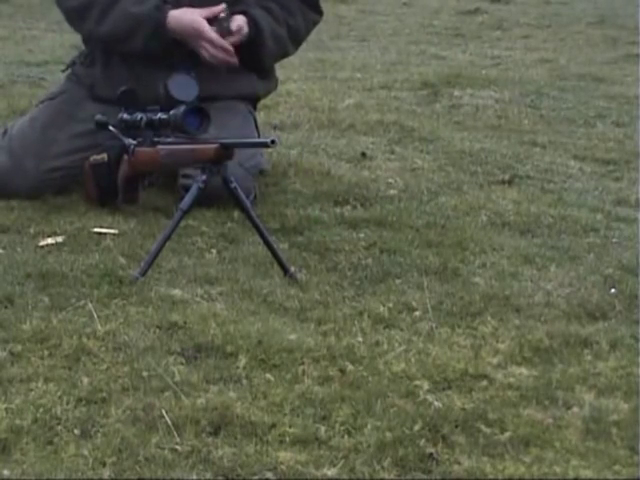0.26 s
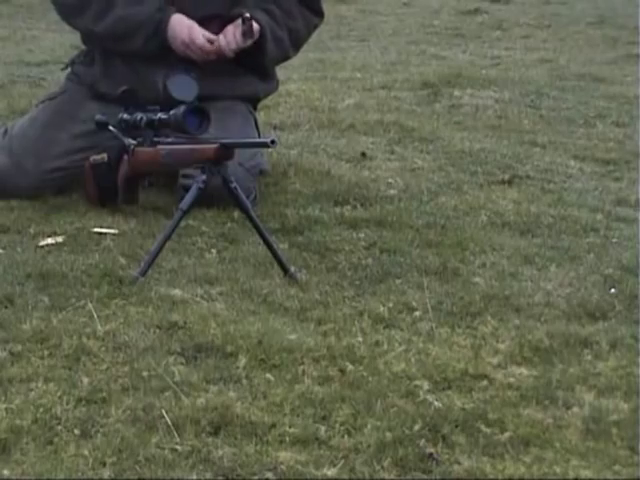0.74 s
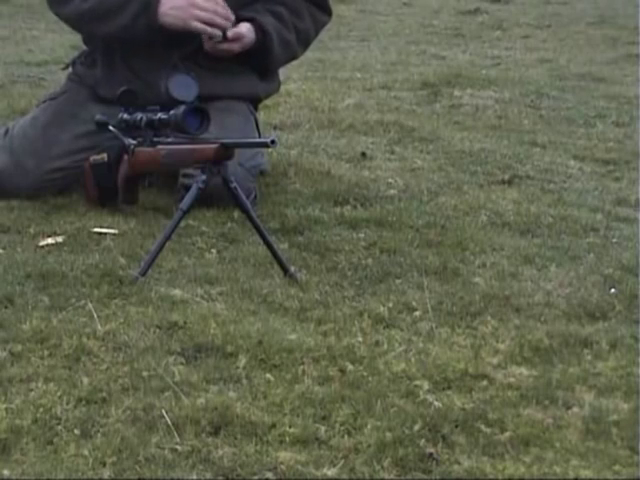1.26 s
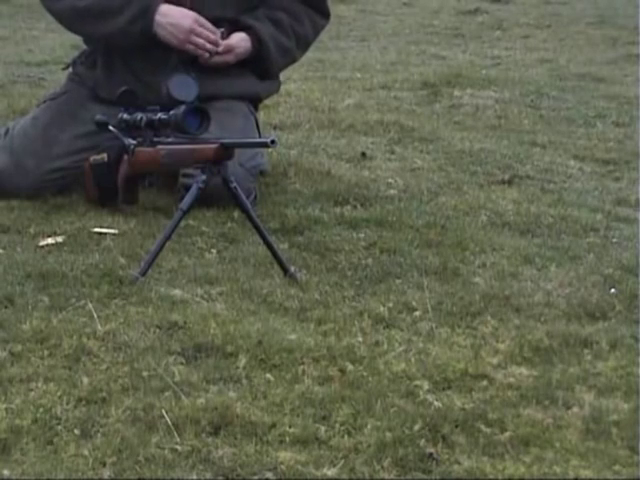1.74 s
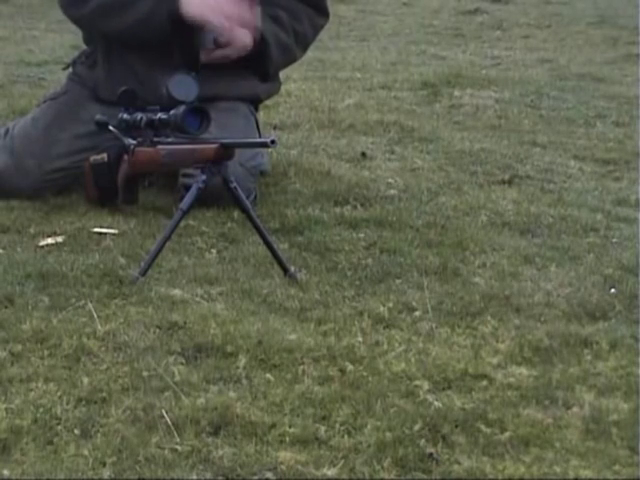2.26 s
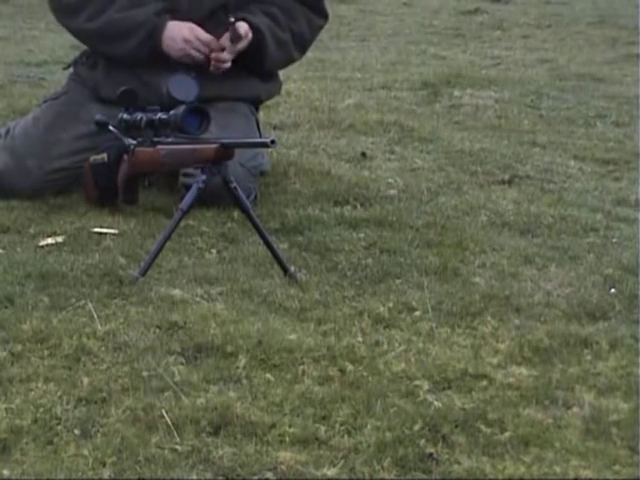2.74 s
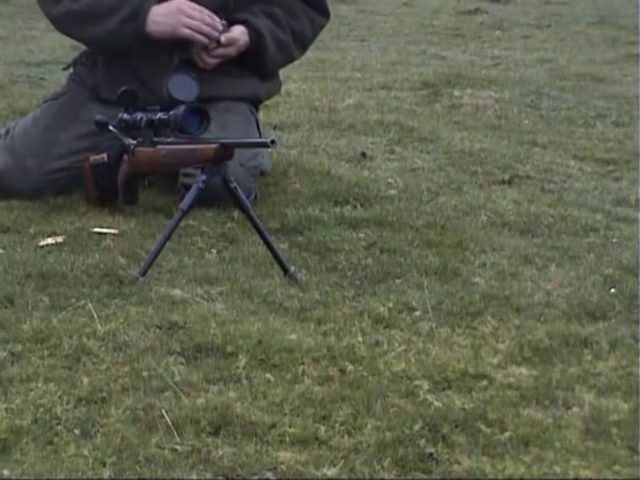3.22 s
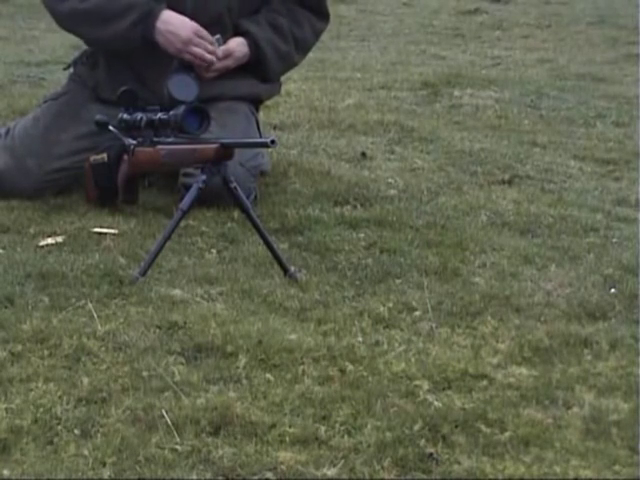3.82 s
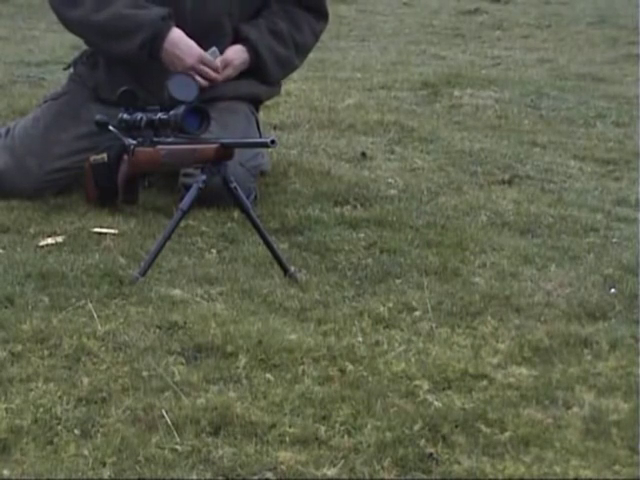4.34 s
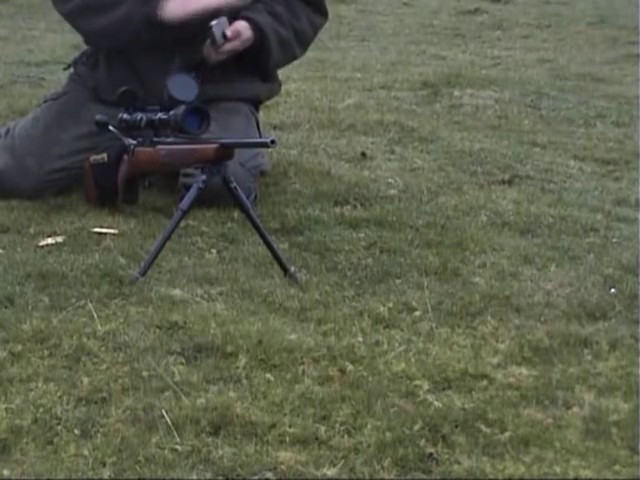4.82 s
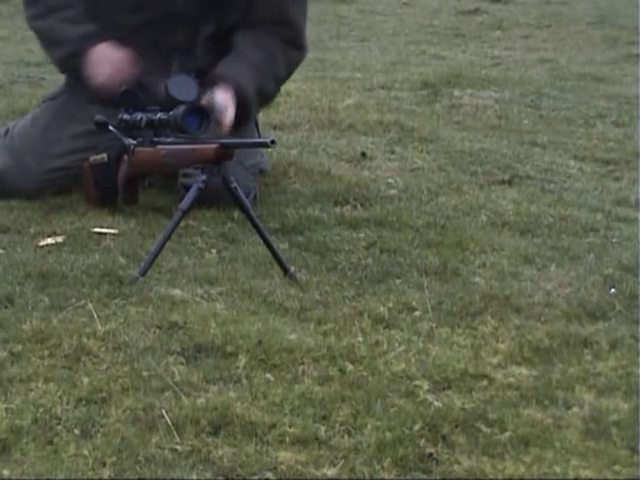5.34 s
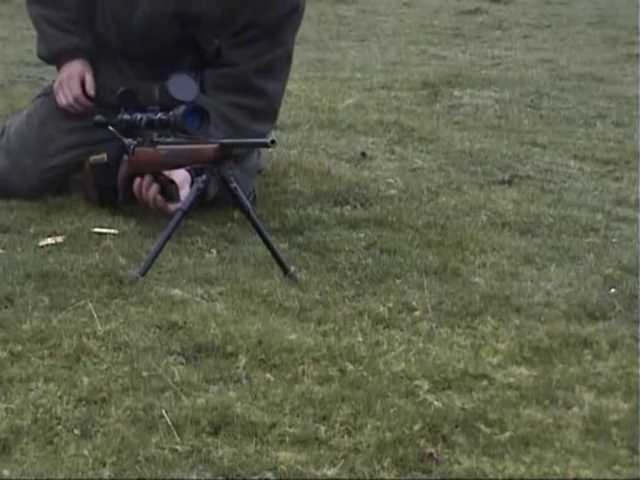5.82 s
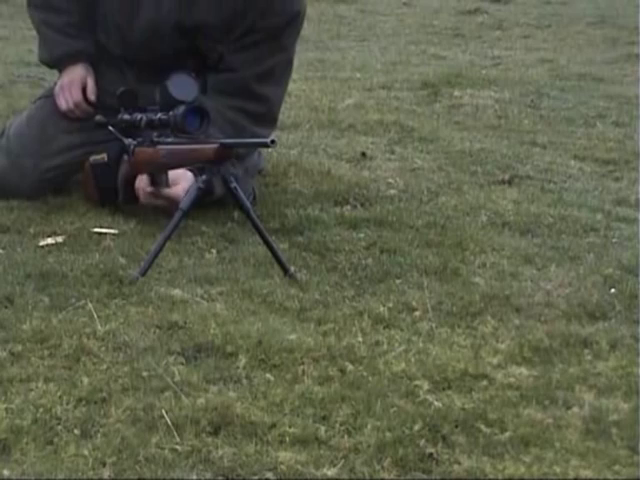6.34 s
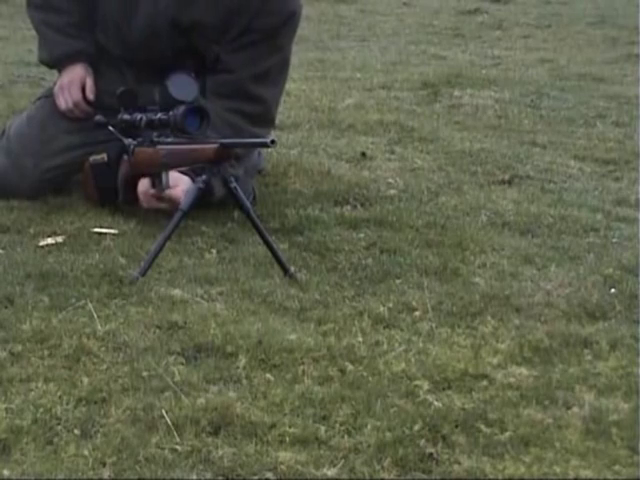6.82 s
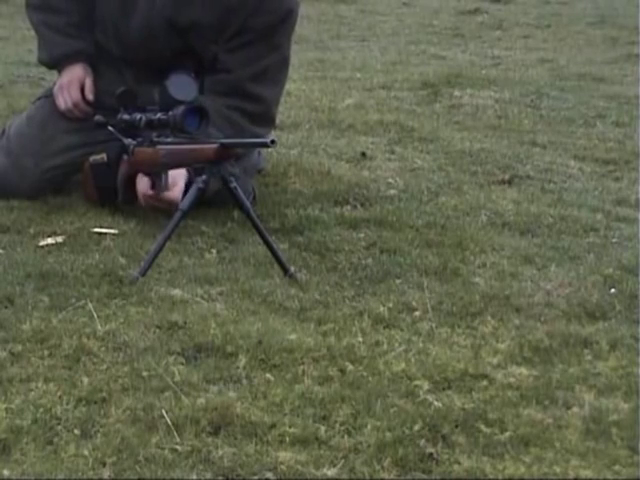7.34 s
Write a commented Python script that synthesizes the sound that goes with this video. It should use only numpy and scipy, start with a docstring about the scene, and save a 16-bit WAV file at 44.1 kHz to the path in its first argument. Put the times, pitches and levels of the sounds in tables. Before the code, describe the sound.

Outdoors, close hands press cartridges into a steel magazine: a crisp click pair at the start, then sparse small ticks and faint scrapes. A hard bright metallic slap lands around five seconds, followed by lighter fumbling ticks, a seating click and a final sharp latch snap. A steady thin high camera-motor whine, soft hiss, far rumble and wavering low engine-like hum continue underneath, recorded by an on-camera stereo microphone.

```python
"""All through, a camera's motors whine in thin steady tones over hiss, a far rumble and a wavering low hum.
Over this, outdoors, cartridges are pressed into a steel magazine, which is slapped and latched into a rifle.
The motors are sums of sine tones and a repeating rattle; hiss and rumble are filtered noise, the hum one sine.
Each click is a short chatter of metal contacts ringing steel modes. Scrapes and soft hand thumps are
short bursts of shaped noise."""
import sys
import numpy as np
from scipy import signal
from scipy.fft import rfft, irfft, next_fast_len
from scipy.io import wavfile
from scipy.ndimage import map_coordinates

SR = 44100
rng = np.random.default_rng(int(sys.argv[2]) if len(sys.argv) > 2 else 0)


def dump(signal):
    """Clip the signal to [-1, 1] and save it as 16-bit WAV at the path in sys.argv[1]."""
    limited = np.clip(np.atleast_2d(signal).T, -1, 1)
    pcm = np.round(limited * 32767).astype(np.int16)
    wavfile.write(sys.argv[1], SR, pcm)


def amplitude_ratio(level_db):
    """Convert a level in decibels to the matching linear amplitude (field) ratio."""
    exponent = np.asarray(level_db, float) / 20
    return 10 ** exponent


N = 334278  # length in samples

# How fast the teeth pass in the two motors. Each entry: rate in Hz.
TEETH_HZ = 95.748, 96.026
# How fast the two motor shafts turn. Each entry: turns per second.
SHAFTS_HZ = 95.748 / 7, 96.026 / 8
# Strong tones of the first motor. Each row: multiple of its tooth rate, left level in dB, right level in dB.
FIRST_MOTOR = [(12, -72, -69), (59, -69, -72), (64, -75, -67), (65, -71, -65), (69, -71, -67),
               (70, -73, -62), (74, -76, -63), (76, -73, -66), (78, -85, -63), (79, -76, -66),
               (80, -64, -70), (81, -73, -68), (82, -80, -67), (86, -80, -63), (92, -76, -69),
               (93, -76, -68), (99, -65, -70), (111, -65, -73), (112, -80, -67), (123, -69, -65)]
# Some tones of the second motor. Each row: multiple of its tooth rate, left level in dB, right level in dB.
SECOND_MOTOR = [(81, -67, -66), (84, -77, -65), (93, -84, -66), (99, -66, -70), (111, -75, -68)]
# Tones that belong to neither motor's series. Each row: pitch in Hz, left level in dB, right level in dB.
STRAY_TONES = [(5193.2, -77, -66), (6236.6, -72, -67), (7360.0, -75, -67), (8204.5, -74, -65),
               (9779.1, -66, -69)]
# Tone colour of the weak shaft rattle. Each row: frequency in Hz, relative level in dB.
RATTLE_COLOUR = [(1000, -13), (3500, -13), (5500, 1), (8500, -26), (11500, -5.5), (12300, -13),
                 (12500, -30), (14400, -8.5), (15300, -67)]
# Tone colour of hiss and far rumble. Each row: frequency in Hz, relative level per Hz in dB.
AIR_COLOUR = [(15, -52), (25, -24), (76, -15), (110, -16.5), (140, -12.5), (175, -19), (249, -7),
              (463, -12), (962, -15), (1160, -13), (1400, -17.5), (2760, -19.5), (5280, -20.5),
              (7920, -17.5), (11000, -19), (12100, -38), (12350, -36), (12450, -46), (13300, -44),
              (14400, -21), (15300, -70)]
# How alike hiss and rumble are left and right. Each row: frequency in Hz, likeness from -1 to 1.
AIR_LIKENESS = [(60, 1), (160, 0.43), (270, 0.88), (450, 0.072), (740, -0.33), (1300, 0.34), (3000, 0.11),
                (5000, 1), (9000, 0.37), (12500, -0.18)]
# Swell of the deep rumble. Each row: time in seconds, boost in dB.
DEEP_SWELL = [(0, 5.5), (1.1, 5.5), (1.5, 8.5), (2.6, 8), (3.6, 8.5), (4.2, 6), (5, 5), (6, 5), (7.58, 6.5)]
# Path of the far hum, before it wavers. Each row: time in seconds, pitch in Hz, level in dB.
HUM_PATH = [(0.0, 76.7, -55.5), (1.35, 81.5, -72), (1.73, 70.5, -65), (1.9, 80.33, -63.5),
            (4.33, 76.7, -57), (4.66, 81.3, -69), (4.79, 70.5, -66), (5.15, 76.0, -69), (7.01, 75.6, -57),
            (7.33, 82.3, -74), (7.58, 70.7, -68)]
# Metal contacts. Each row: start in seconds, middle-band level in dB before the mix, brightness in dB (added
# to the high band, taken from the low), favoured ring in Hz, time for the chatter to fall 60 dB in seconds.
CONTACTS = [(.0556, -47.5, -7.5, 2550, 0.023), (.0967, -25.5, 1, 2685, 0.027),
            (.1033, -37, 1.5, 1080, 0.013), (.1076, -42, 1, 3840, 0.022), (.2365, -47.5, 0, 2520, 0.02),
            (.2925, -53, 4, 2470, .016), (.3462, -46, 11, 2450, 0.019), (.3552, -43, 7, 6130, 0.023),
            (.3592, -26.5, 4, 1300, 0.014), (.3675, -34, 2.5, 8950, 0.0057),
            (1.4129, -30.5, 1, 8570, 0.017), (1.4197, -28.5, 3.5, 2550, 0.015),
            (1.545, -54, -2, 2440, 0.014), (1.7231, -48.5, 3.5, 1500, 0.013),
            (1.7305, -45.5, 0, 7760, 0.0078), (1.7458, -47, 5, 3200, 0.02), (1.8028, -45, 2, 4130, 0.0054),
            (1.9618, -47, 9, 4140, 0.0062), (2.1074, -34.5, 3.5, 3040, 0.0075),
            (2.2125, -49.5, -12.5, 2510, 0.018), (2.2209, -38.5, 5.5, 2440, 0.007),
            (3.3674, -43, 5.5, 2800, 0.0083), (3.456, -49, 2, 810, 0.0041),
            (3.5039, -40.5, 1.5, 2700, .009), (3.5961, -44, 1, 2500, 0.012), (3.6681, -51, 2, 3960, .013),
            (3.755, -46, 13, 4030, 0.0033), (3.7977, -52, -1, 3840, .016), (3.8507, -45, -3.5, 3880, 0.006),
            (4.397, -40, -1, 1960, 0.0099), (4.4242, -50.5, -0.5, 2060, 0.034),
            (4.5584, -29.5, 0.5, 2060, 0.014), (4.5756, -48, -1, 2200, .008),
            (4.6072, -50, 4, 9100, 0.0059), (4.6234, -34, 0.5, 2250, 0.012),
            (4.9803, -27.5, 4.5, 1925, 0.0087), (4.9822, -26.5, 9.5, 3750, .008),
            (4.9898, -22.5, 10, 2440, 0.015), (4.9921, -20, 4.5, 6220, 0.0054),
            (4.9953, -23, 6, 5570, 0.011), (5.0189, -52, 0, 1900, .007), (5.3178, -42, 7, 3380, 0.0092),
            (5.3254, -45, 0.5, 3420, 0.0054), (5.365, -38, -1, 3160, .007), (5.4837, -45, -4, 3380, 0.0056),
            (5.8968, -41, 0.5, 2030, 0.018), (5.8997, -28, 5, 3230, .01), (5.9065, -46, -1, 1800, 0.024),
            (5.95, -38.5, 0, 3200, 0.0062), (5.9544, -41.5, 4.5, 3300, .014), (5.9653, -48, 1, 3220, .013),
            (6.1464, -30.5, -1.5, 2744, 0.0047), (6.1528, -49.5, -3, 1820, .013),
            (6.159, -48, 3, 3260, .012), (6.3617, -46.5, -4, 1530, 0.014), (6.678, -57, 2, 1530, 0.01),
            (6.9912, -59, 7, 7800, .004), (7.0963, -41.5, 1, 9000, 0.0087), (7.1032, -40, 2.5, 8800, 0.011),
            (7.1087, -42.5, 0, 1580, .014), (7.1757, -45.5, 2, 2050, 0.027), (7.4309, -47, 4, 9000, .01),
            (7.4963, -27, 0, 2850, 0.012), (7.4975, -25, 4, 5040, 0.009), (7.4992, -36, -6, 1900, 0.011),
            (7.5045, -42, -3, 1890, .016)]
# Ringing modes of magazine, cartridges and latch. Each row: pitch in Hz, relative level in dB,
# time to fall 60 dB in seconds.
STEEL = [(766, -7.5, 0.025), (1063, -2, 0.026), (1390, -12.5, 0.0043), (1510, -4.5, 0.034),
         (1750, -1, 0.018), (1869, 1.5, 0.0037), (1986, 1.5, 0.0056), (2335, 3, 0.024), (2687, -1.5, 0.01),
         (2800, -3, 0.0056), (3320, -12, 0.011), (3450, -8.5, 0.005), (3660, 8, 0.0034), (3714, 8, 0.011),
         (3940, -17, 0.0029), (4750, -0.5, 0.0039), (4550, 2, 0.01), (5856, 5, 0.021), (5797, 1.5, 0.0081),
         (5690, 7.5, 0.0043), (6400, -7.5, 0.0014), (8030, 5, 0.009), (8350, 3, 0.01), (9100, 2, 0.0047),
         (9900, 0, 0.005), (11320, 6, 0.004)]
# Low, middle and high part of a click. Each entry: centre in Hz.
BANDS_HZ = [1500, 3700, 8000]
# Steel sliding on steel. Each row: start in seconds, length in seconds, level in dB before the fade and mix,
# ring in Hz.
SCRAPES = [(.341, .016, -44, 2450), (2.088, .02, -53, 3200), (2.198, .022, -49, 2450),
           (3.615, .014, -54, 2550), (4.383, .015, -44, 2170), (5.928, .022, -52, 2600),
           (6.243, .042, -50, 1080), (6.287, .02, -51, 1080), (6.305, .026, -47, 1750)]
# Soft thumps of the hand. Each row: start in seconds, level in dB before the fade and mix,
# time to fall 60 dB in seconds.
THUMPS = [(4.99, -27.5, 0.021), (5.489, -47, 0.068), (5.952, -37.5, 0.044), (6.319, -47, .03)]


def unit(x):
    """Scales a sound to rms 1."""
    return x / np.sqrt(np.mean(x ** 2) + 1e-20)


def along(points, hz):
    """Reads (Hz, value) points on a log frequency axis."""
    f, v = np.transpose(points)
    return np.interp(np.log(hz + 1), np.log(f + 1), v)


def wobble(rate):
    """Draws a smooth random curve with rate knots a second."""
    knots = rng.standard_normal(int(N * rate / SR) + 4)
    return map_coordinates(knots, [np.arange(N) * rate / SR])


def filtered(x, response):
    """Filters x by a response that is a function of frequency."""
    m = next_fast_len(x.shape[-1] + 4096)
    spectrum = rfft(x, m) * response(np.fft.rfftfreq(m, 1 / SR))
    return irfft(spectrum, m)[..., :x.shape[-1]]


def resonance(f, hz, width):
    """A resonance that rings only after it is struck, with gain 1 at its centre; hz and width in Hz."""
    return 1j * f * width / (hz * hz - f * f + 1j * f * width)


def bump(f, hz, span):
    return np.exp(-(np.log(f / hz) / span) ** 2)


def add(track, sound, start):
    """Mixes a sound into the track from sample start."""
    track[start:start + len(sound)] += sound


def motor_tones():
    """Steady tones through the camera body, with other strengths and phases in each microphone."""
    t, out = np.arange(N) / SR, np.zeros((2, N))
    # the second motor also sounds every sixth multiple from 43 to 85, all at one level (left, right dB)
    second = SECOND_MOTOR + [(order, -72, -66) for order in range(43, 86, 6)]
    tones = []
    for rate, rows in zip(TEETH_HZ, (FIRST_MOTOR, second)):
        tones += [(order * rate, *db) for order, *db in rows]
    for hz, *db in tones + STRAY_TONES:
        phase = rng.uniform(0, 2 * np.pi) + rng.normal(0, 0.23, (2, 1))
        # the highest tones reach the two microphones in nearly opposite sense
        phase += (hz > 11500) * np.array([[0], [2.8]])
        level = np.sqrt(2) * amplitude_ratio(np.array(db)[:, None])
        out += level * np.sin(2 * np.pi * hz * t + phase)
    return out


def shaft_rattle(level_db=-59):
    """Every turn of a shaft repeats the same faint rattle, which sounds as many weak tones."""
    out = np.zeros((2, N))
    for shaft in SHAFTS_HZ:
        period = round(SR / shaft)  # samples in one turn
        order = np.arange(period // 2 + 1)
        uneven_db = 9 * rng.standard_normal((2, len(order)))
        sizes = amplitude_ratio(uneven_db + along(RATTLE_COLOUR, shaft * order))
        shared = rng.standard_normal(period)
        noise = shared + 0.63 * rng.standard_normal((2, period))
        turn = irfft(rfft(noise) * sizes, period)
        rattle = np.tile(turn, N // period + 1)[:, :N]
        out += amplitude_ratio(level_db) * unit(rattle) * amplitude_ratio([[-1.5], [1.5]])
    return out


def air(level_db=-50):
    """Noise makes hiss above and a far rumble below, whose deep part swells slowly."""
    def spread(f):
        # splits the noise between middle and side to give the wanted likeness
        angle = np.arccos(np.clip(along(AIR_LIKENESS, f), -1, 1)) / 2
        return amplitude_ratio(along(AIR_COLOUR, f)) * np.array([np.cos(angle), np.sin(angle)])

    mid, side = filtered(rng.standard_normal((2, N)), spread)
    pair = unit(np.array([mid + side, mid - side])) * amplitude_ratio([[-.4], [.4]])
    low = filtered(pair, lambda f: 1 / (1 + (f / 480) ** 6))
    deep = filtered(pair, lambda f: 1 / (1 + (f / 180) ** 6))
    hiss = pair - low
    rumble = amplitude_ratio(2.13 * wobble(7.4)) * (low - deep)
    swell_db = np.interp(np.arange(N) / SR, *np.transpose(DEEP_SWELL))
    return amplitude_ratio(level_db) * (hiss + rumble + amplitude_ratio(swell_db) * deep)


def hum():
    """A far engine-like tone, one sine that wavers in pitch and strength."""
    s, *columns = np.transpose(HUM_PATH)
    hz, db = [np.interp(np.arange(N) / SR, s, column) for column in columns]
    phase = 2 * np.pi * np.cumsum(hz) / SR + 0.17 * wobble(4.5)
    return np.sqrt(2) * amplitude_ratio(db + 1.1 * wobble(6.3)) * np.sin(phase)


def contacts(size=4096, lead=256, head=200):
    """A blow and its spiky chatter drive the steel modes; where it lands sets favoured ring and brightness."""
    # size: samples in a click, lead: silent samples before it, head: samples that set its level
    out, t, f = np.zeros(N + size), np.arange(size - lead) / SR, np.fft.rfftfreq(size, 1 / SR)
    hz, level_db, t60 = np.transpose(STEEL)[:, :, None]
    signs = (-1.) ** np.arange(len(STEEL))[:, None]
    modes = signs * resonance(f, hz, np.log(1000) / (np.pi * t60))
    # low, middle and high band fade into one another
    shares = [np.interp(np.log(f + 1), np.log(BANDS_HZ), row) for row in np.eye(3)]
    edges = f ** 4 / (f ** 4 + 850 ** 4) / (1 + (f / 11000) ** 4)  # trims bass and top treble
    noise, spikes = rng.standard_normal((2, len(CONTACTS), len(t)))
    scatter = rng.standard_normal((len(CONTACTS), len(STEEL), 1))
    for k, (s, mid_db, bright_db, ring_hz, chatter) in enumerate(CONTACTS):
        fade_db = 60 * (t / chatter) ** 1.6  # the rattle stops ever faster as the parts seat
        force = noise[k] * amplitude_ratio(6 * spikes[k] - fade_db) * (1 - np.exp(-t / .0005))
        force += 3.5 * np.exp(-((t - .0004) / .00003) ** 2)  # the blow itself
        strike_db = 10 * bump(hz, ring_hz, .06) + 2.2 * scatter[k]
        steel = 0.51 + np.sum(amplitude_ratio(level_db + strike_db) * modes, 0)  # crack plus ringing
        click = rfft(np.pad(force, (lead, 0))) * steel * edges
        # the struck part also swells the wide band around its ring
        body = amplitude_ratio(8 * bump(f + 1, ring_hz, .17) - 4)
        # a ring near the middle band leaves the outer bands weak
        outer_db = mid_db + 4.46 - 7 * bump(ring_hz, 3520, 0.74)
        for share, db in zip(shares, (outer_db - bright_db, mid_db, outer_db + bright_db)):
            part = irfft(click * share, size)
            part = part / np.std(part[lead:lead + head])
            part = irfft(rfft(part) * body, size)
            add(out, part * amplitude_ratio(db), round(s * SR) - lead)
    return out[:N]


def ground(x, size=2048):
    """A very short scatter off hands, turf and camera body, brighter upward, other at each microphone."""
    t, out = np.arange(SR // 100) / SR, np.zeros((N + SR, 2))
    bright = filtered(x, lambda f: .5 + (f / 8000) ** 2)
    for start in range(0, N, size):  # a fresh random scatter for each short stretch, so clicks differ in colour
        tail = rng.standard_normal((2, len(t))) * amplitude_ratio(-60 * t / .005)
        tail /= np.linalg.norm(tail, axis=1, keepdims=True)
        echo = signal.fftconvolve(bright[None, start:start + size], tail, axes=1)
        add(out, echo.T, start)
    return out[:N].T


def scrapes():
    """Steel slides on steel: spiky noise rings one narrow mode and a wider band."""
    out, t = np.zeros(N + SR), np.arange(SR // 8) / SR
    for s, length, db, hz in SCRAPES:
        noise, spikes = rng.standard_normal((2, len(t)))
        grit = noise * amplitude_ratio(2.5 * spikes)
        rub = filtered(grit, lambda f: resonance(f, hz, 130) + .3 * resonance(f, 2200, 2600) ** 2)
        envelope = np.sin(np.pi * np.clip(t / length, 0, 1)) ** 0.16
        add(out, amplitude_ratio(db) * unit(rub) * envelope, round(s * SR))
    return out[:N]


def thumps():
    """A palm or knuckle gives a puff of dull noise that starts fast and dies away."""
    out, t = np.zeros(N + SR), np.arange(SR // 8) / SR
    for s, db, t60 in THUMPS:
        puff = unit(filtered(rng.standard_normal(len(t)), lambda f: resonance(f, 253, 310) ** 2))
        envelope = amplitude_ratio(db - 60 * t / t60) * (1 - np.exp(-t / 0.00071))
        add(out, envelope * puff, round(s * SR))
    return out[:N]


def scene():
    """Puts the hands slightly to the right, with the background all round."""
    hands = contacts() + thumps() + scrapes()
    near = hands * amplitude_ratio([[-.2], [1.9]]) + amplitude_ratio(-7) * ground(hands)
    # the microphones fall off steeply in the top octave
    near = filtered(near, lambda f: 0.014 + 1 / (1 + (f / 12300) ** 16))
    return near + motor_tones() + shaft_rattle() + air() + hum()


def low_pass(x):
    """Removes everything above the highest recorded frequency."""
    return signal.sosfilt(signal.butter(12, 16810, fs=SR, output="sos"), x)


def record(dry):
    """Loud clicks drive the microphones lopsided, mostly in opposite senses, and clip softly."""
    push = filtered(dry ** 2, lambda f: resonance(f, 200, 1200))
    lopsided = dry + push * [[-.45], [.33]]
    clipped = lopsided / (1 + np.abs(lopsided / 1.1) ** 4) ** .25
    mix = filtered(clipped, lambda f: f < 16800)  # nothing above 16800 Hz
    return low_pass(mix)


dry = scene()
out = record(dry)
dump(out)
```